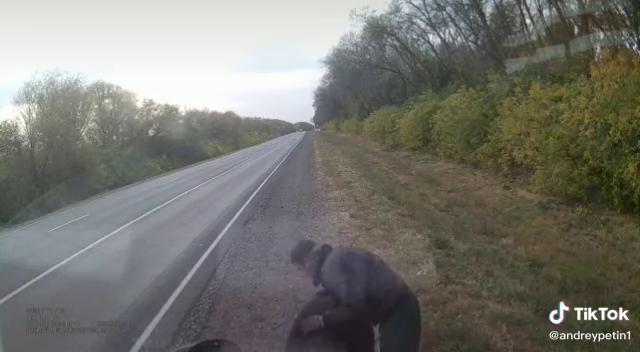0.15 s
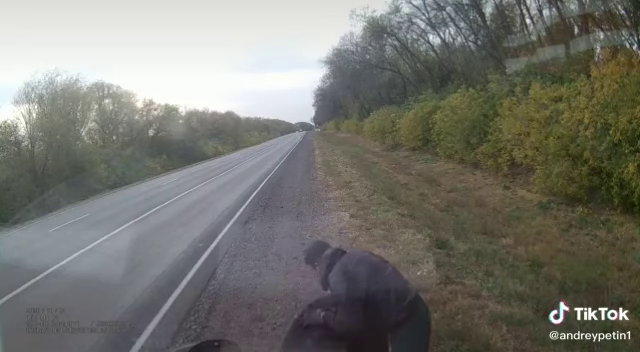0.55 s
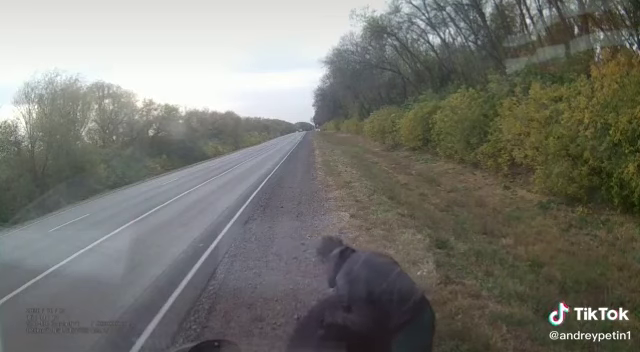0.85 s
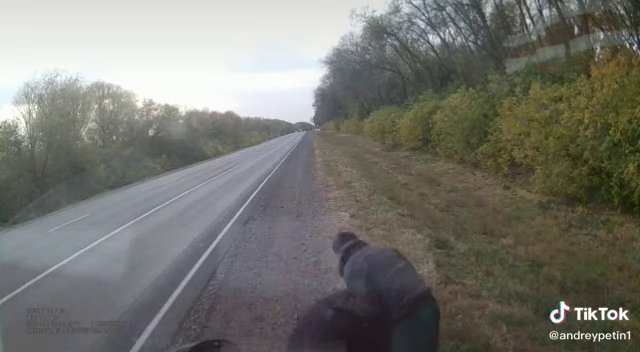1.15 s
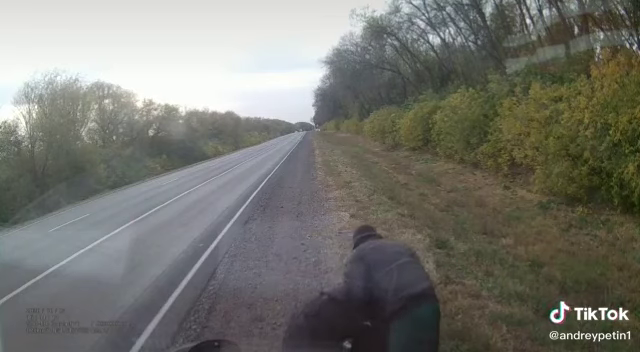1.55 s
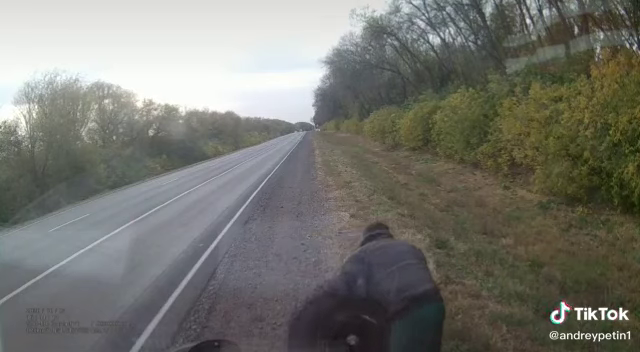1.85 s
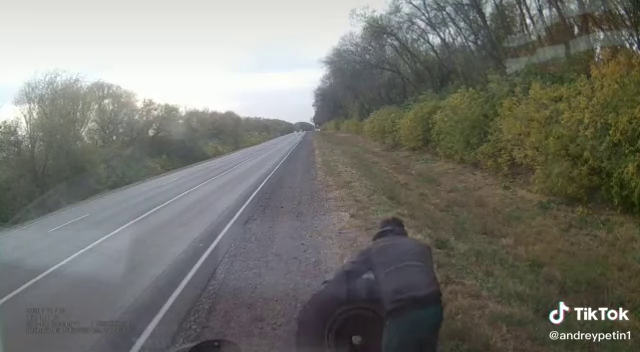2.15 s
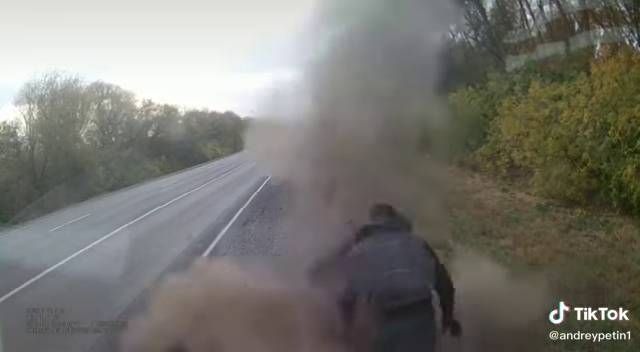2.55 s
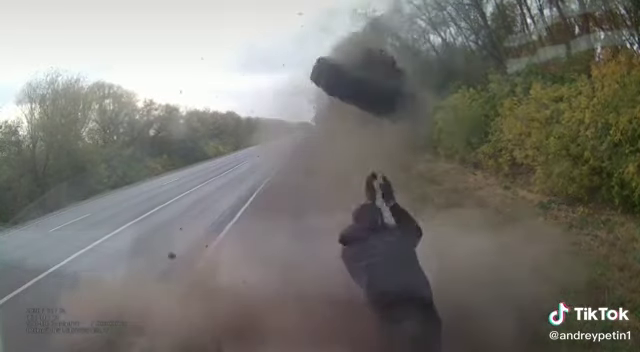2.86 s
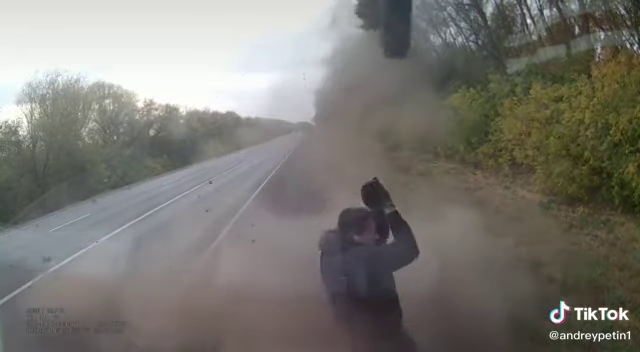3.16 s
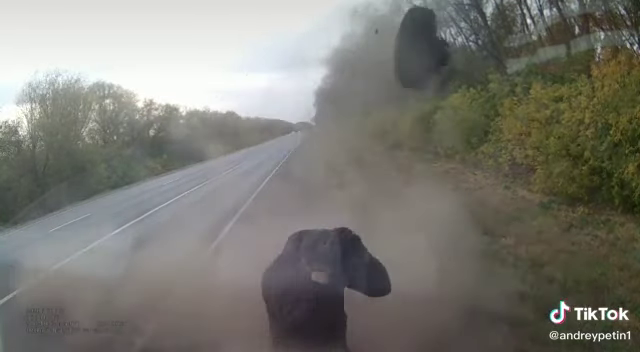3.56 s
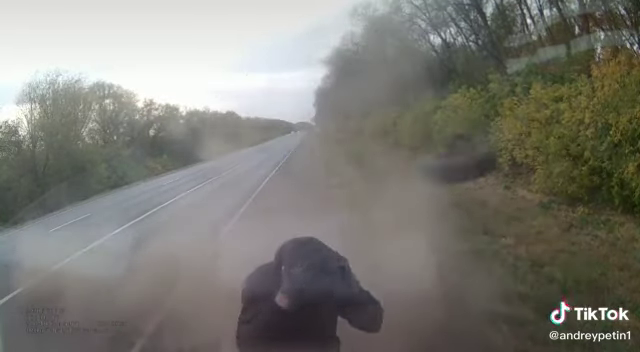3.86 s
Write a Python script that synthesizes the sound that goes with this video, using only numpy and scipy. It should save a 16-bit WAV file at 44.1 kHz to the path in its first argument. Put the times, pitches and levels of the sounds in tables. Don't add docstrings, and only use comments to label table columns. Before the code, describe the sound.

A tyre bursts at about 2.4 s, an abrupt, clipped boom that shakes the cabin of a parked car. Before it, only a quiet, rough pump drone with airy hiss, which continues underneath. Until about 2.85 s, dense grit, sharp cracks and stones pelt the bodywork as the boom fades. From 3 to 4 s, scattered stones, bright ticks, panel knocks, tumbling rubber and soft heavy thuds. Thin, bass-light microphone.

```python
import sys
import numpy as np
from scipy import signal
from scipy.fft import rfft, irfft
from scipy.io import wavfile

SR = 44100
rng = np.random.default_rng(int(sys.argv[2]) if len(sys.argv) > 2 else 0)


def boost(x):
    u = np.asarray(x, float) / 20
    return 10 ** u


def master_out(mix):
    frames = np.transpose(np.atleast_2d(mix))
    ceiling = np.clip(frames, -1, 1)
    pcm = np.round(ceiling * 32767).astype(np.int16)
    wavfile.write(sys.argv[1], SR, pcm)


N = 176400

# pitch in Hz, width in Hz, level in dB.
DRONE_TONES = [(225, 28, -12), (347, 23, 3.5), (378.5, 38, 0.5), (477, 48, -7.5), (577, 33, -11),
               (731.5, 34, 2), (938, 32, -6), (1082, 41, -14.5), (1192, 32, -11.5), (1425, 78, -5),
               (1725, 26, -6), (1855, 30, -2), (1990, 26, -10.5), (2120, 51, 1)]
# pitch in Hz, width in Hz, level in dB.
DRONE_HIGH_TONES = [(2270, 35, -5.5), (2330, 23, -3), (2494, 36, -7.5), (2776, 66, -7.5), (4050, 32, -12),
                    (4310, 41, -12.5), (4760, 130, -14.5), (5170, 98, -14), (5850, 67, -20),
                    (6510, 66, -13.5), (6770, 165, -19.5)]
# frequency in Hz, level in dB per Hz.
HISS_COLOUR = [(50, -9), (85, 2.5), (130, 2), (210, 7.5), (1000, -8.5), (3500, -13.5), (6900, -18.5),
               (7200, -31.5)]
# pitch in Hz, width in Hz, depth from 0 to 1.
CABIN_NULLS = [(281, 46, 0.9), (640, 19, 0.2), (830, 65, 1), (980, 36, .7), (1148, 42, 0.8), (1250, 55, .8),
               (1600, 150, 0.47), (1780, 36, .7), (1900, 53, 1), (2040, 57, .8), (2230, 19, 0.7),
               (2446, 73, .85), (5350, 60, .8), (6430, 70, 0.8)]
# time in seconds, level in dB.
BOOM_LEVEL = [
    (2.404, -58),
    (2.408, -24),
    (2.416, -7),
    (2.445, -10),
    (2.48, -20),
    (2.495, -13),
    (2.53, -22),
    (2.72, -25),
    (2.97, -43),
]
# pitch in Hz, width in Hz, level in dB.
CABIN_TONES = [(121, 22, -1), (193, 47, 1), (294, 91, -1), (465, 47, -2.5), (562, 47, -2.5), (695, 65, -4),
               (895, 120, -8)]
# start in
# seconds, peak in dB, pitch in Hz, time to fall 60 dB in seconds.
PANEL_KNOCKS = [(2.4065, -22, 513, 0.24), (2.44, -7, 81.6, 0.28), (2.80, -37, 121, .9),
                (2.839, -11, 5000, 0.0088), (2.4502, -6, 2780, 0.028), (3.0845, -13, 2280, .015),
                (3.089, -20, 5730, 0.012), (3.1535, -33, 4850, 0.021), (3.156, -26, 6600, .025),
                (3.159, -18.5, 2200, 0.043), (3.157, -23, 4800, 0.087), (3.3618, -19, 2533, .06),
                (3.364, -26, 815, 0.41), (3.365, -23, 403, 0.2), (3.366, -26, 1020, 0.19),
                (3.368, -22.5, 673, 0.19), (3.385, -16, 590, 0.068), (3.386, -25, 225, 0.25),
                (3.602, -24, 6000, .02), (3.696, -25.5, 1700, 0.1), (3.698, -23, 337, 0.12),
                (3.7, -28, 2675, 0.076), (3.867, -21, 477, 0.039), (3.882, -25, 615, 0.12),
                (3.5752, -21, 3900, .012), (3.605, -23, 3820, 0.058), (3.6249, -8, 2240, 0.014),
                (3.632, -10, 2490, 0.0082), (3.7862, -4, 6670, 0.0066), (3.836, -29, 3670, .02)]
# time in seconds, level in dB.
SHOWER_LEVEL = [(2.4145, -50), (2.4165, -12), (2.455, -16), (2.49, -16.5), (2.605, -23.5), (2.643, -13.5),
                (2.659, -19.5), (2.68, -18.5), (2.707, -22.5), (2.716, -16.5), (2.74, -19), (2.775, -21.5),
                (2.82, -30.5), (2.97, -40), (3.5, -40.5), (3.66, -42), (3.78, -37), (4.0, -42)]
# frequency in Hz, level in dB per Hz.
GRIT_COLOUR = [(150, 1), (300, -24), (600, 6), (1100, -2.5), (2200, 0), (6000, -8), (8500, -12.5),
               (15500, -22.5)]
# pitch in Hz, width in Hz, level in dB.
SHELL_TONES = [(2250, 350, -10), (3640, 940, -3.5), (4800, 1000, -11), (6320, 2000, 2.5)]
# start in seconds, peak in dB, lowest frequency in Hz.
BRITTLE_SNAPS = [(2.4262, -4, 3000), (2.4975, -8, 3000), (2.6358, -5, 3000), (2.6637, -2, 5000),
                 (2.676, -8, 4000), (2.700, -4, 2500), (2.7445, -5, 2000), (2.8605, -22, 5000),
                 (2.984, -18, 1500), (3.719, -20, 8000), (3.9144, -22, 9000), (3.552, -20, 5000),
                 (3.2935, -19, 2000), (3.349, -24, 5000), (2.7835, -5, 2500), (2.794, -8, 2500),
                 (2.806, -10, 1800), (2.8378, -6, 2600), (2.9645, -28, 1800), (3.602, -13, 4500),
                 (3.6243, -18, 1800), (3.7862, -9, 4500)]
# start in seconds, peak in dB, ring in Hz, time to fall 60 dB in seconds.
EARLY_STONES = [(2.496, -20, 2200, 0.11), (2.6378, 9.5, 3080, 0.024), (2.6626, 7.5, 7440, 0.038),
                (2.6999, 5.5, 5740, 0.019), (2.7122, 4, 5700, 0.036), (2.745, -9, 2120, 0.037),
                (2.8058, -3.5, 2190, 0.022), (2.8705, -12, 2250, 0.038), (2.8747, -16, 2270, 0.06),
                (2.922, -25, 5000, 0.055), (2.9265, -14.5, 5970, 0.076), (2.9849, -24, 3270, 0.23),
                (3.0618, -18, 3800, 0.13), (3.0805, -19, 3300, 0.079), (3.0845, -10, 2580, 0.054),
                (3.087, -13, 5400, 0.042), (3.1114, -16, 3120, 0.027), (3.153, -14, 5000, 0.044),
                (3.1555, -9.5, 4640, 0.086), (3.1954, -30, 5450, 0.031), (3.2141, -20.5, 2450, 0.036),
                (3.2284, -18, 6600, 0.043), (3.2431, -20.5, 2280, 0.2), (3.2918, -19.5, 3570, 0.026),
                (3.3025, -20, 2470, 0.04), (3.3393, -22, 2690, 0.044), (3.3484, -25, 2540, 0.029)]
# start in seconds, peak in dB, ring in Hz, time to fall 60 dB in seconds.
LAST_STONES = [(3.3612, -8, 2750, 0.15), (3.3708, -8.5, 4050, 0.068), (3.3856, -21, 3860, 0.04),
               (3.392, -29, 2270, 0.13), (3.4638, -14, 2050, 0.022), (3.5713, -19, 2170, 0.019),
               (3.6011, -9.5, 2740, 0.056), (3.6025, -10.5, 6000, 0.056), (3.6805, -18.5, 6130, 0.14),
               (3.698, -16, 2680, 0.07), (3.7794, -9, 7200, 0.018), (3.788, -15.5, 6500, 0.1)]
# start in seconds, peak in dB, ring in Hz, time to fall 60 dB in seconds.
BRIGHT_CHIPS = [
    (3.5126, -16, 7700, 0.018),
    (3.552, -16.5, 7630, 0.014),
    (3.6234, -14, 7500, 0.026),
    (3.6357, -14, 8970, 0.03),
    (3.719, -18, 8520, 0.016),
    (3.8055, -12.5, 7700, 0.041),
    (3.8297, -10, 8300, 0.015),
    (3.9144, -27, 7510, 0.033),
    (3.9744, -20, 9510, 0.015),
]
# time in seconds, level in dB.
RUMBLE_LEVEL = [
    (2.6, -35),
    (2.85, -59),
    (3.2, -45),
    (3.55, -42.5),
    (3.72, -35),
    (3.87, -35),
    (4.0, -38.5),
]
# start in seconds, level in dB, time to fall 60 dB in seconds.
HEAVY_THUDS = [
    (3.086, -23.5, 0.074),
    (3.363, -20, 0.11),
    (3.385, -30.5, 0.51),
    (3.465, -35, 0.048),
    (3.628, -27, 0.1),
    (3.695, -22.5, 0.036),
    (3.868, -34, 0.16),
]
# pitch in Hz, width in Hz, level in dB.
PANEL_TONES = [(162, 87, 4), (292, 193, 3), (532, 69, 3.5), (626, 62, -1), (863, 205, -3.5),
               (1240, 270, -8), (1606, 200, -5), (2340, 540, -9)]
# frequency in Hz, level in dB per Hz.
MIC_NOISE_COLOUR = [(100, -28), (7000, -21), (9500, -3), (12800, 10), (15400, -11)]

RISE_S = 0.0004


def noise(count=N):
    return rng.standard_normal(count)


def rms_one(x):
    return x / np.sqrt(np.mean(x ** 2) + 1e-20)


def in_time(rows):
    seconds, db = np.transpose(rows)
    return boost(np.interp(np.arange(N) / SR, seconds, db, left=-120))


def at_hz(points, hz):
    curve_hz, db = np.transpose(points)
    return np.interp(np.log(hz), np.log(curve_hz), db)


def coloured(x, points):
    hz = np.arange(len(x) // 2 + 1) * SR / len(x) + 1
    return irfft(rfft(x) * boost(at_hz(points, hz)), len(x))


def drift(rate_hz):
    r = np.exp(-2 * np.pi * rate_hz / SR)
    slow = signal.lfilter([1], [1, -2 * r, r * r], noise(N + SR))[SR:]
    return rms_one(slow - slow.mean())


def high_pass(x, hz, order=2):
    return signal.sosfilt(signal.butter(order, hz, "high", fs=SR, output="sos"), x)


def resonance(x, hz, width_hz):
    r = np.exp(-np.pi * width_hz / SR)
    top = (1 - r * r) / 2
    return signal.lfilter([top, 0, -top], [1, -2 * r * np.cos(2 * np.pi * hz / SR), r * r], x + 1e-18)


def body(x, tones):
    return sum((-1) ** k * boost(db) * resonance(x, hz, width) for k, (hz, width, db) in enumerate(tones))


def shell(x):
    return rms_one(x + sum(boost(db) * resonance(x, hz, width) for hz, width, db in SHELL_TONES))


def strike(start_s, db, t60_s, rise_s=RISE_S):
    t = np.arange(SR // 4) / SR
    fall = boost(db - 60 * t / max(t60_s, 0.004))
    return int(start_s * SR), fall * (1 - np.exp(-t / rise_s))


def reflected(x):
    t = np.arange(SR // 8) / SR
    echo = high_pass(noise(len(t)), 2950) * boost(-60 * t / 0.12)
    echo = boost(-2) * echo / np.sqrt(np.sum(echo ** 2))
    return x + signal.fftconvolve(x, echo)[:N]


def pump():
    tones = list(DRONE_TONES) + list(DRONE_HIGH_TONES)
    drone = sum(boost(db) * resonance(noise(), hz, width) for hz, width, db in tones)
    flicker_db = 0.6 * drift(29)
    hiss = rms_one(reflected(coloured(noise(), HISS_COLOUR)))
    air = rms_one(drone) * boost(-46 + flicker_db) + boost(-48.5) * hiss
    for hz, width, depth in CABIN_NULLS:
        air = air - depth * resonance(air, hz, width)
    return air


def boom():
    before_end = np.arange(N) < BOOM_LEVEL[-1][0] * SR
    return in_time(BOOM_LEVEL) * before_end * rms_one(body(noise(), CABIN_TONES))


def knocks():
    out = np.zeros(N + SR)
    for start_s, db, hz, t60_s in PANEL_KNOCKS:
        i, shape = strike(start_s, db, t60_s)
        t = np.arange(len(shape)) / SR
        out[i:i + len(shape)] += shape * np.sin(2 * np.pi * hz * t)
    return out[:N]


def shower():
    grains_per_s, spread_db, ring_cycles = 3000, 2.6, 6
    sizes = boost(spread_db * np.minimum(rng.exponential(1, N), 5)) * rng.choice([-1, 1], N)
    clump = boost(1.4 * drift(28))
    hits = sizes * (rng.random(N) < grains_per_s * clump / SR)
    place = rng.integers(0, 24, N)
    rings = np.zeros(N)
    for k, hz in enumerate(np.geomspace(300, 14500, 24)):
        ring = rms_one(resonance(hits * (place == k), hz, hz / ring_cycles))
        rings += boost(at_hz(GRIT_COLOUR, hz)) * np.sqrt(hz) * ring
    dust = rms_one(coloured(noise(), GRIT_COLOUR))
    return in_time(SHOWER_LEVEL) * clump * shell(rms_one(rings) + boost(3) * dust)


def snaps():
    out = np.zeros(N + SR)
    dull = signal.butter(1, 5000, fs=SR)
    for start_s, db, lowest_hz in BRITTLE_SNAPS:
        i, shape = strike(start_s, db, 0.011)
        crack = signal.lfilter(*dull, noise(len(shape)))
        out[i:i + len(shape)] += high_pass(shape * crack, lowest_hz)
    return out[:N]


def stones():
    level_db, tick_db, tick_t60_s, swell_s = -9.5, 5, 0.0024, 0.00098
    out = np.zeros(N + SR)
    crack = shell(coloured(noise(N + SR), GRIT_COLOUR))
    for start_s, db, hz, t60_s in list(EARLY_STONES) + list(LAST_STONES) + list(BRIGHT_CHIPS):
        i, shape = strike(start_s, db + level_db, t60_s, swell_s)
        _, tick = strike(start_s, db + level_db + tick_db, tick_t60_s)
        burst = high_pass((shape + tick) * crack[i:i + len(shape)], 0.57 * hz)
        out[i:i + len(shape)] += burst + boost(-2) * resonance(burst, hz, 400)
    return out[:N]


def rumble_and_thuds():
    push = np.zeros(N + SR)
    for start_s, db, t60_s in HEAVY_THUDS:
        i, shape = strike(start_s, db, t60_s, 0.0055)
        push[i:i + len(shape)] += shape
    tumbling = in_time(RUMBLE_LEVEL) * boost(5 + 1.1 * drift(45)) * noise()
    shaken = high_pass(tumbling, 675, order=1) + push[:N] * noise()
    return boost(16.5) * high_pass(body(shaken, PANEL_TONES), 148)


def scene():
    cabin = None
    air = pump()
    shaken = boom() + rumble_and_thuds()
    debris = shower() + stones() + knocks() + snaps()
    return (air + shaken + debris)[None]


def band_limit(x):
    return signal.sosfilt(signal.butter(12, 16830, fs=SR, output="sos"), x)


def record(dry):
    overload = 0.28
    flat = dry / (1 + (np.abs(dry) / overload) ** 6) ** (1 / 6)
    hiss = boost(-67.5) * rms_one(coloured(noise(), MIC_NOISE_COLOUR))
    thin = high_pass(flat, 460, order=1) + hiss
    top_cut = signal.ellip(12, 0.5, 38, 15450, fs=SR, output="sos")
    return band_limit(signal.sosfilt(top_cut, thin))


dry = scene()
out = record(dry)
master_out(out)
```